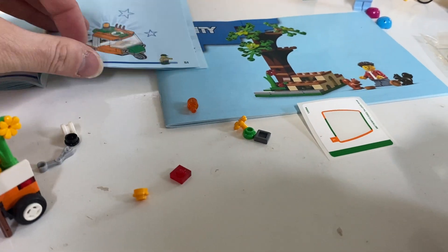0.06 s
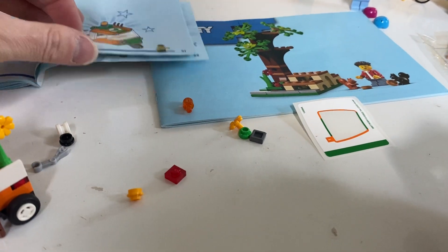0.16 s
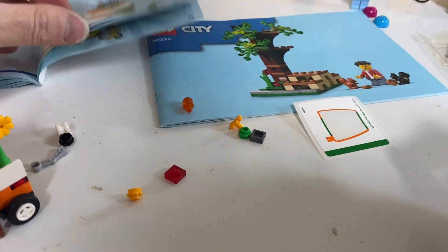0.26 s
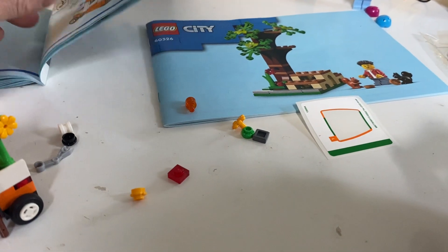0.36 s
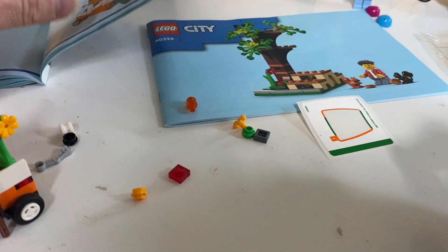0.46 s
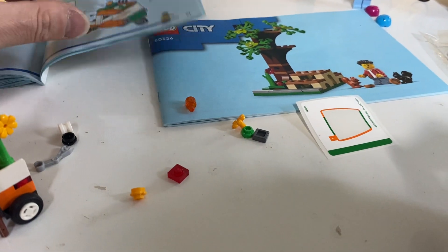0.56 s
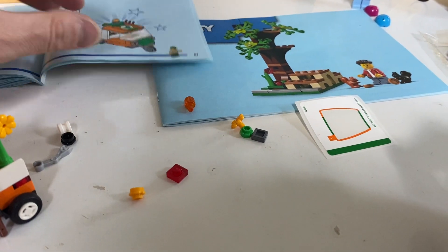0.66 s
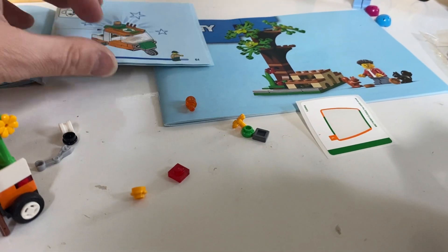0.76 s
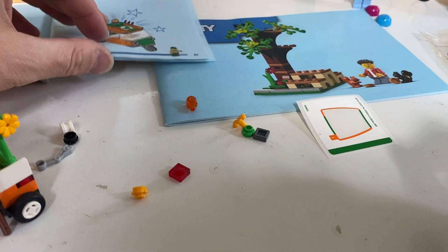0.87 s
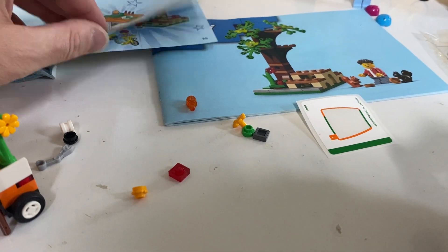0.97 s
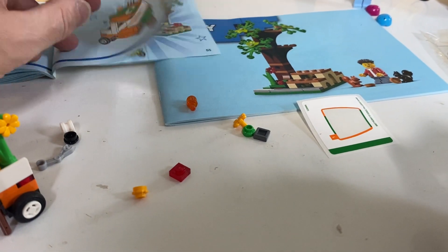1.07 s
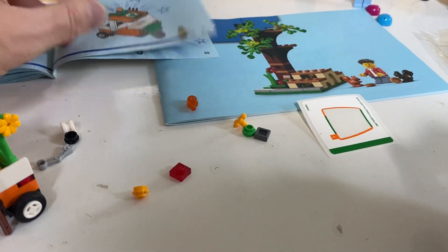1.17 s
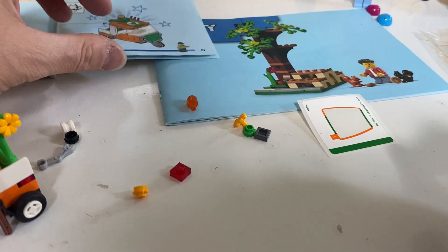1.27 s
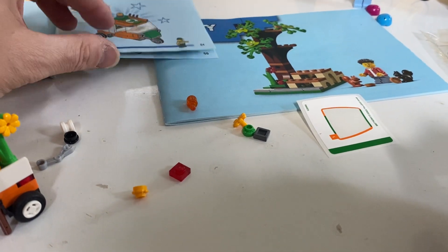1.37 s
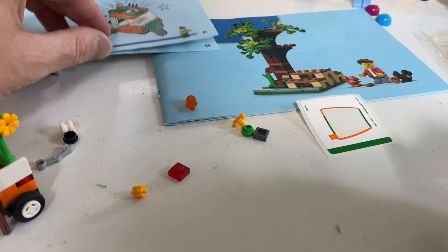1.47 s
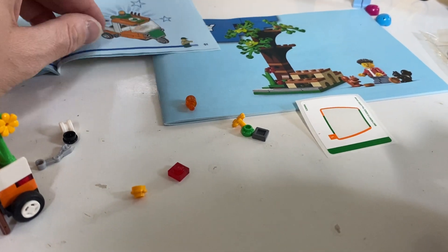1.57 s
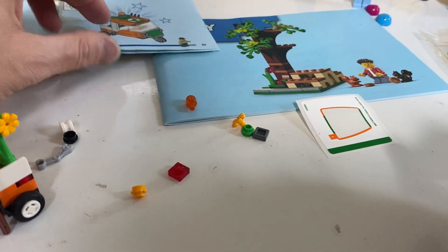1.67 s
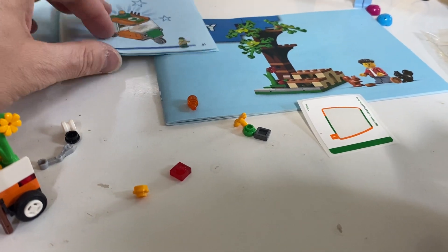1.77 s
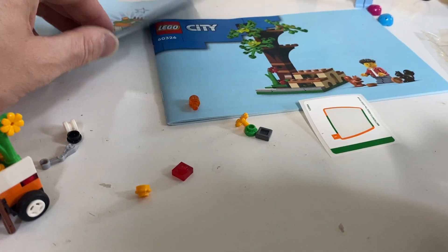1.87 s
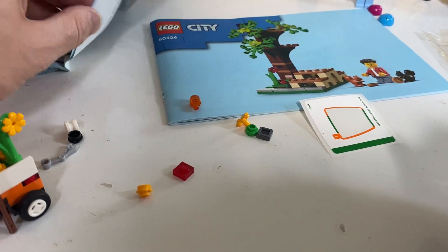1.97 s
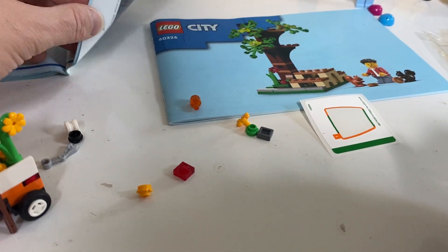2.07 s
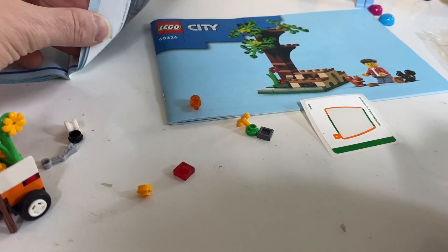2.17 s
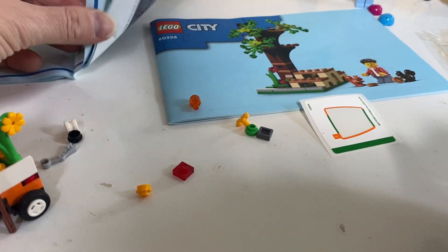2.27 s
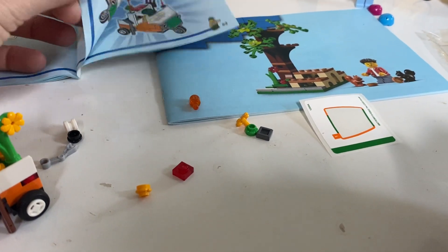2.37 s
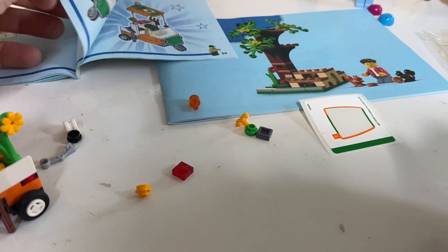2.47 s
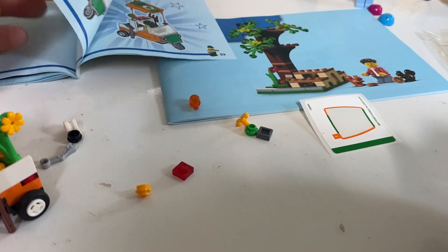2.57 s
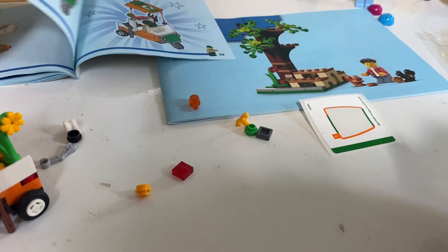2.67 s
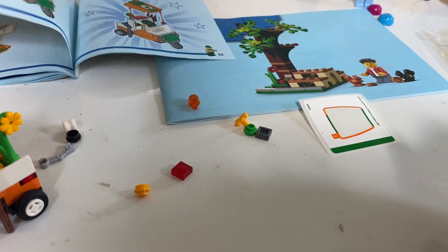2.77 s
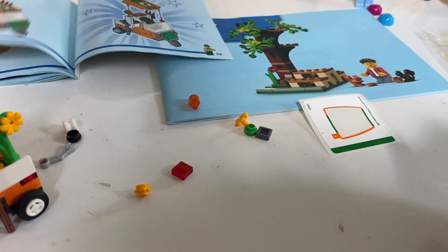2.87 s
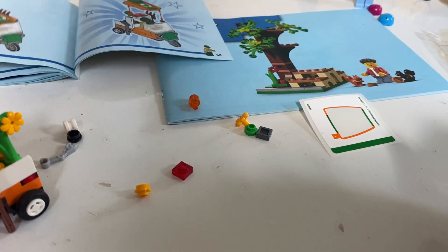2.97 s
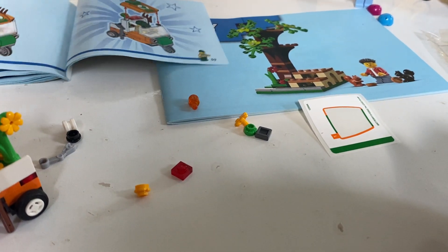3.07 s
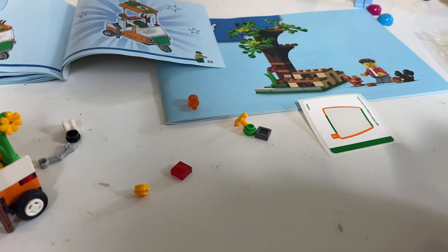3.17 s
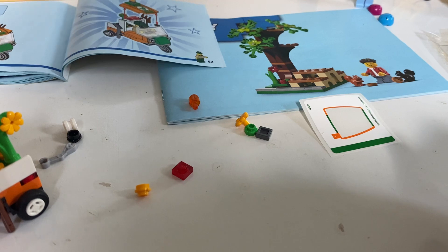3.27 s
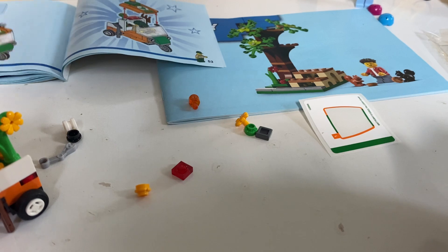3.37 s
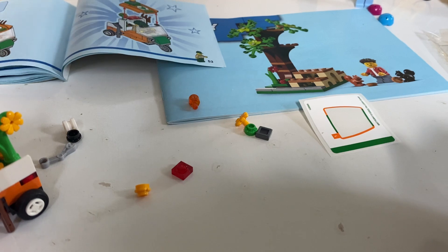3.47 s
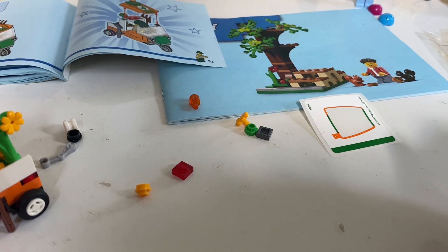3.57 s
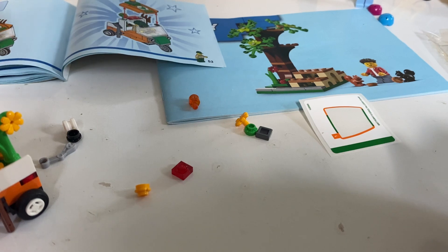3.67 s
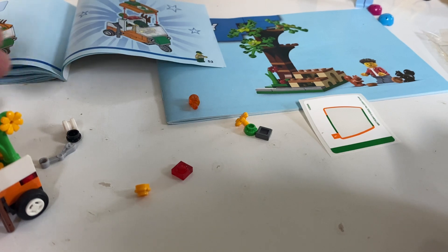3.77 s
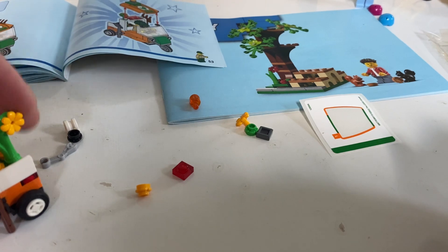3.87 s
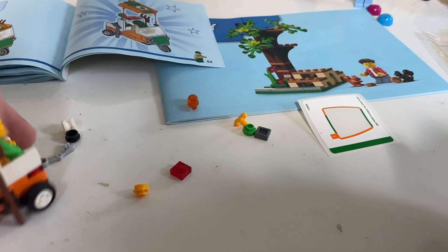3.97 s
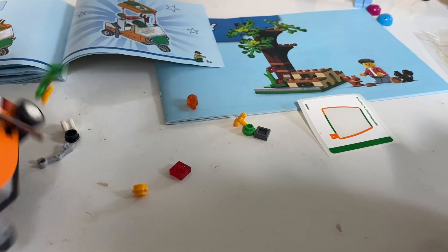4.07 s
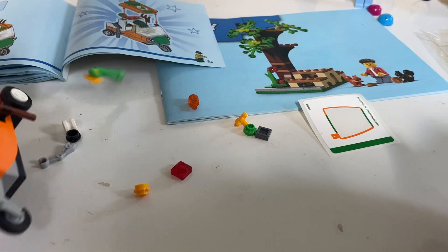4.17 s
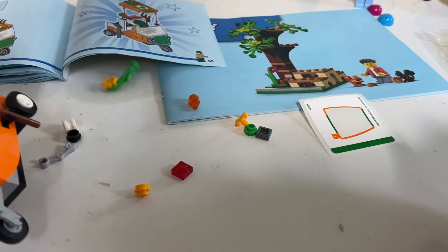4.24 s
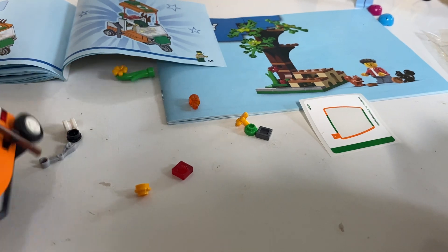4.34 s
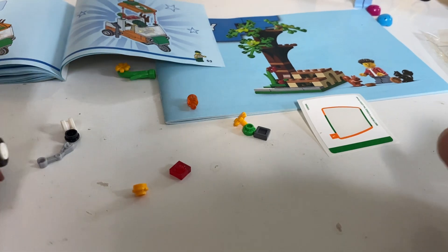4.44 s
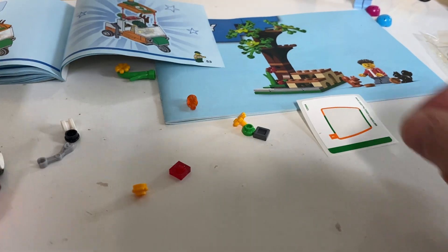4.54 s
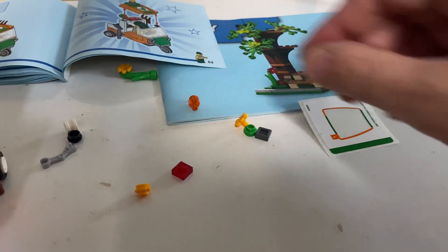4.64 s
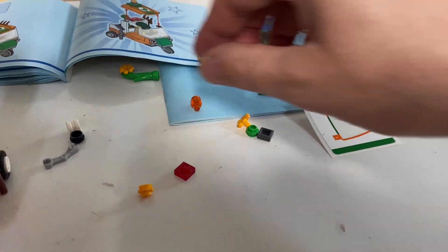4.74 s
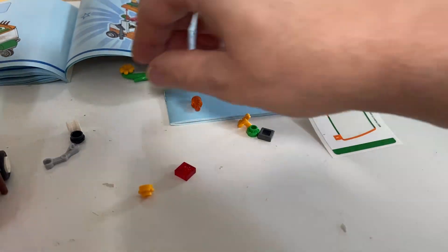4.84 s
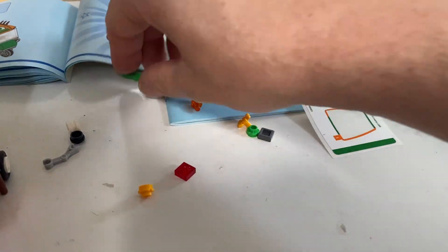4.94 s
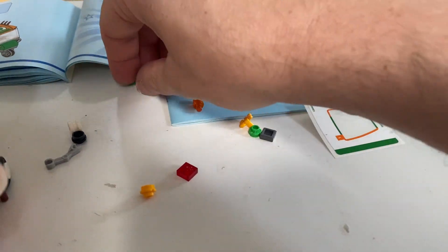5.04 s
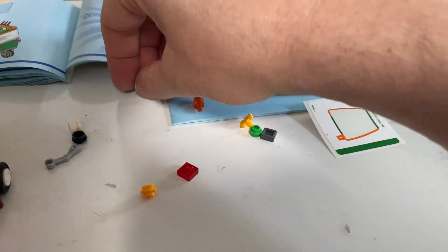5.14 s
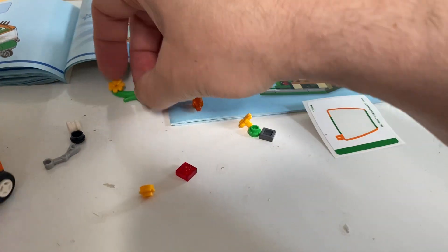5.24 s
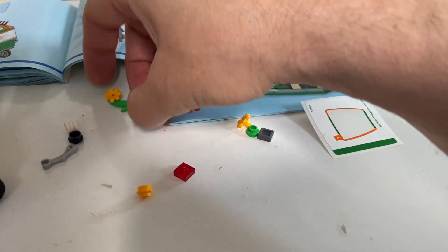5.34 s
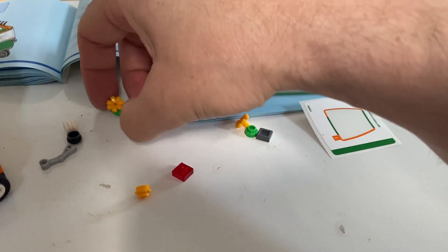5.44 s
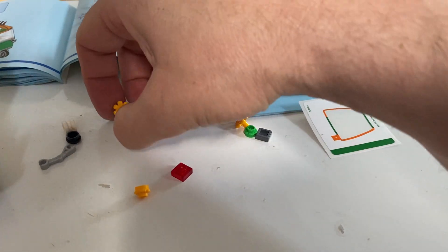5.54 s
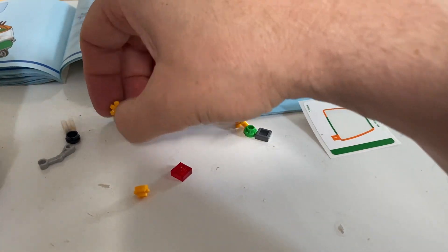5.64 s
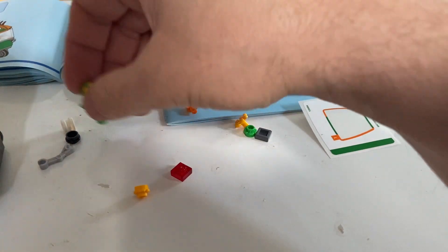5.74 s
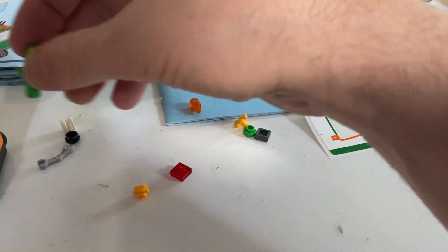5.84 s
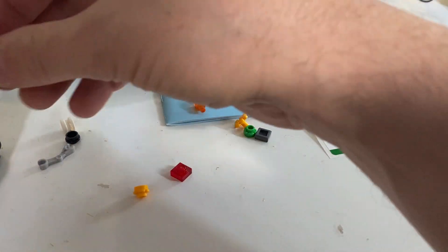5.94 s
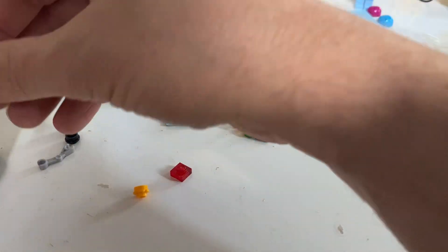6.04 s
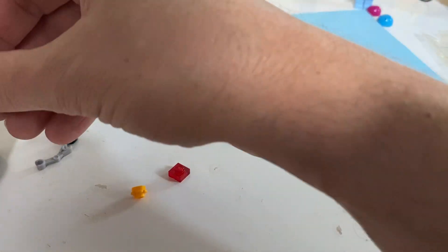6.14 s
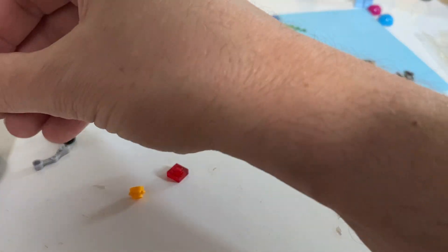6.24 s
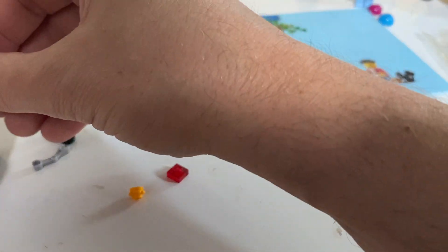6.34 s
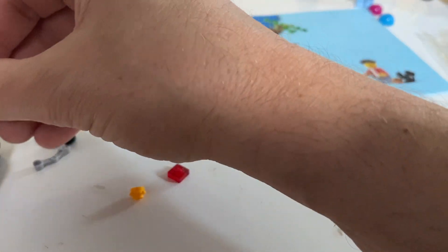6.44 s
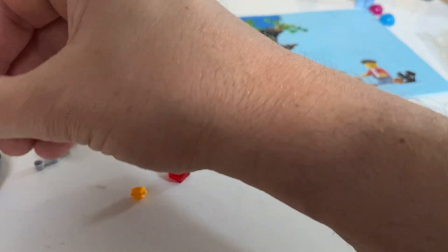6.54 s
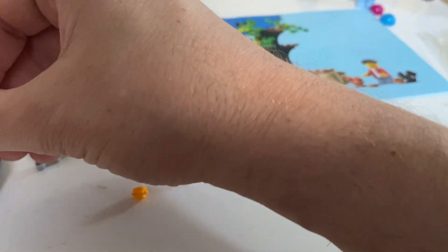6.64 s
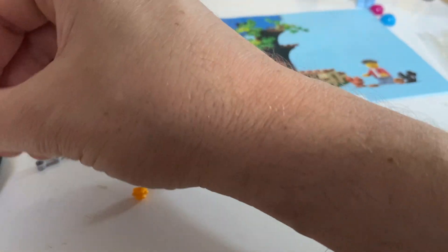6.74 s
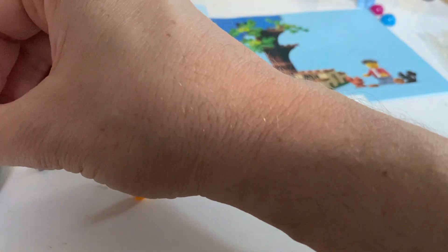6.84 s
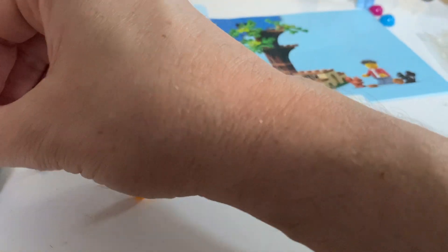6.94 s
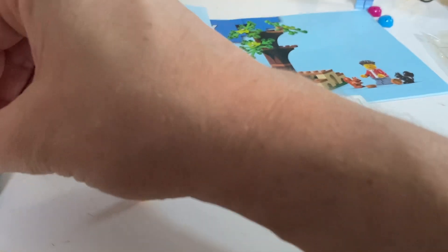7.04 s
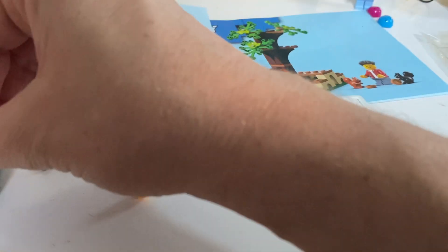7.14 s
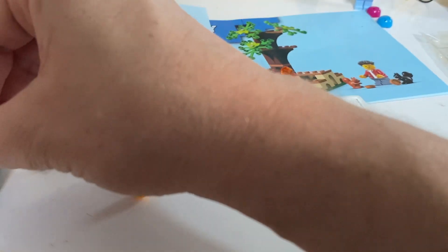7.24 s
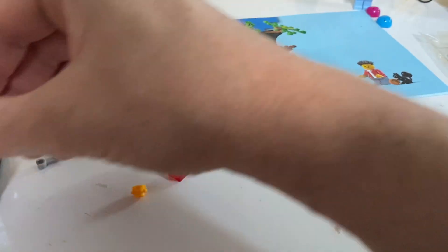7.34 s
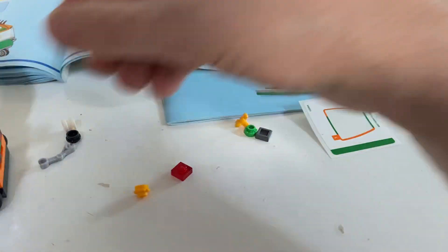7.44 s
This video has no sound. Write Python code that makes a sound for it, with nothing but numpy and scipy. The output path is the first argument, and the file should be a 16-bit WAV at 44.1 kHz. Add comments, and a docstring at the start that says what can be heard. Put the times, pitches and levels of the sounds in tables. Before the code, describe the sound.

Close on a table in a small room, a paper booklet's pages swish, flap and snap for over three seconds. Then a plastic brick toy is picked up with loud, sharp clacks; a loose part drops, bounces and taps quickly to rest. Soft bumps, light clicks, a brief scraping judder and faint finger rubs follow, over low rumble and faint hiss.

```python
"""A toy of plastic bricks is picked up from a table: it clicks, and a shed part bounces and rocks to rest.
Each contact is struck, detuned resonances plus short noise bursts. Before it a paper booklet's page turns:
gated friction noise with snaps. Soft bumps are low bursts; fingers rub and squeak as noise and wandering
tones; a part dragged back judders in rapid slips. A low rumble, a table murmur and a faint hiss lie
underneath, and a small room answers."""
import sys
import numpy as np
from scipy import signal
from scipy.fft import rfft, irfft, next_fast_len
from scipy.io import wavfile
from scipy.ndimage import uniform_filter1d, map_coordinates

SR = 44100
rng = np.random.default_rng(int(sys.argv[2]) if len(sys.argv) > 2 else 0)


def store_wav(level_fs):
    """Save 16-bit WAV to argv[1]."""
    pcm = np.round(np.clip(np.atleast_2d(level_fs), -1, 1) * 32767)
    wavfile.write(sys.argv[1], SR, pcm.T.astype(np.int16))


N = 330880


def amp(db):
    """Decibels to linear gain."""
    return 10 ** (np.asarray(db) / 20)


def unit(x):
    """Scale to rms 1."""
    return x / np.sqrt(np.mean(x ** 2) + 1e-20)


def along(points, hz):
    """Read (frequency, value) points on a log frequency axis."""
    f, v = np.transpose(points)
    return np.interp(np.log(hz + 1), np.log(f + 1), v)


def curves(rows):
    """One value per sample for each column after the time."""
    s, *cols = np.transpose(rows)
    return [np.interp(np.arange(N) / SR, s, c) for c in cols]


def wobble(rate):
    """A random curve of straight segments, rate knots a second."""
    knots = rng.standard_normal(int(N * rate / SR) + 4)
    return map_coordinates(knots, [np.arange(N) * rate / SR], order=1)


def filtered(x, response):
    """Shape x by a (possibly complex) response of frequency."""
    n = x.shape[-1]
    m = next_fast_len(n + 4096)
    return irfft(rfft(x, m) * response(np.fft.rfftfreq(m, 1 / SR)), m)[..., :n]


def noise(spectrum, size=N, ripple_db=0):
    """Coloured noise of rms 1 with random resonances; rows: common to both microphones, their difference."""
    grid = np.geomspace(100, SR / 2, 90)
    ripple = ripple_db * rng.standard_normal(len(grid))
    white = rng.standard_normal((2, size))
    return unit(filtered(white, lambda hz: amp(along(spectrum, hz) + np.interp(hz, grid, ripple))))


def add(track, s, sound):
    """Mix a sound in at time s."""
    part = track[:, max(round(s * SR), 0):][:, :sound.shape[-1]]
    part += sound[..., :part.shape[-1]]


def blow(x):
    """Scale a hit to the energy of one millisecond at level 1."""
    return x / np.sqrt(np.sum(x[0] ** 2) * 1000 / SR + 1e-20)


def burst(spectrum, t60, attack, size=8192):
    """Many damped resonances struck at once, a new mix for every point of contact (t60, attack in s)."""
    t = np.arange(size) / SR
    tone = noise(spectrum, size=size, ripple_db=3)
    return blow(tone * amp(-60 * t / t60) * (1 - np.exp(-t / attack)))


def ring(modes, scatter_db, detune, size=8192):
    """A struck body; strengths and pitches shift with the point of contact and the grip."""
    t = np.arange(size) / SR
    hz, db, t60 = np.transpose(modes)[:, :, None]
    strength, shift, skew = rng.standard_normal((3, len(modes), 1))
    sign = rng.choice([-1, 1], hz.shape)
    envelope = amp(db + scatter_db * strength - 60 * t / t60)
    partials = sign * envelope * np.sin(2 * np.pi * hz * (1 + detune * shift) * t)
    return blow(np.array([partials.sum(0), (skew * partials).sum(0)]))


def friction(spectrum, patchy_db, grain_db, catch_db, count=4):
    """Sliding noise of rms 1: a grainy rush with shifting resonances, plus crisp catches at several points."""
    rush = noise(spectrum) * unit(amp(grain_db * wobble(400) + wobble(35)))
    # a random field, smoothed over frequency and time, moves the resonances as the surface bends
    z = signal.stft(rush, nperseg=1024)[2]
    field = uniform_filter1d(rng.standard_normal(z.shape[1:]), size=10, axis=0)
    field = uniform_filter1d(field, size=6, axis=1)
    rush = unit(signal.istft(z * amp(patchy_db * unit(field)), nperseg=1024)[1][:, :N])
    catches = np.zeros((2, N))
    for _ in range(count):
        jolts = (rng.random(N) < 45 / SR) * rng.random(N) ** 3  # about 45 a second, mostly weak
        catch = burst(spectrum, t60=0.0065, attack=0.00014, size=1024)
        catches += signal.oaconvolve(jolts[None], catch, axes=1)[:, :N]
    return unit(rush + amp(catch_db) * unit(catches))


# fader moves of the two low layers: time_s, rumble_db, murmur_db
RUMBLE = [(0.0, -57.5, -71.5), (1.29, -51, -66), (1.5, -56, -66.5), (2.07, -56, -67.5), (3.91, -68, -72.5),
          (4.05, -60.5, -55), (4.76, -57, -63), (5.28, -54, -49.5), (6.33, -61, -67.5), (7.5, -60.5, -63)]
# tone of the rumble, the handling murmur and the steady hiss: frequency_hz, density_db
LOW = [(20, -44.5), (35, -4.5), (58, 4.5), (95, -3), (140, -13.5), (300, -22.5), (1000, -69)]
MURMUR = [(60, -12.5), (130, 2.5), (170, -1.5), (208, 5), (250, -6), (308, -5.5), (450, -11), (2500, -38.5)]
FLOOR = [(100, 9.5), (1000, -12), (3000, -17), (16000, -38)]


def background():
    """An uneven low rumble, the murmur of handling in the table, and a faint steady hiss."""
    rumble_db, murmur_db = curves(RUMBLE)
    uneven = unit(amp(2 * wobble(12)))
    rumble = amp(rumble_db + 1.5) * noise(LOW)
    murmur = amp(murmur_db + 3.0) * noise(MURMUR)
    return uneven * (rumble + murmur) + amp(-76.5) * noise(FLOOR)


SLIDE_ATTACK_S = .03


def slide(s, length, growth_db, fall_db_per_s):
    """Gain of one slide: it sets in, changes by growth_db along its length, and dies as the page stops."""
    t = np.arange(N) / SR - s
    onset = np.clip(t / SLIDE_ATTACK_S, 0, 1)
    growth = growth_db * (np.clip(t / length, 0, 1) - 1)
    return onset * amp(growth - fall_db_per_s * np.clip(t - length, 0, 1))


# page slides; level_db is the hiss at the end of the slide, sheet_db the bending sheet against it:
# start_s, length_s, level_db, sheet_db, growth_db
SLIDES = [(0, 0.3, -70.5, -8.5, -5.5), (0.205, 0.12, -70.5, 9.5, 6), (0.841, 0.19, -55.5, -1, 14.5),
          (1.08, 0.049, -73, 14.5, -7), (1.382, 0.077, -54.5, -5.5, 16), (1.783, 0.33, -60, 0.5, 2),
          (2.029, 0.18, -46, -2.5, 16), (2.2, 0.16, -44, -2.5, 8), (2.437, 0.092, -46.5, -11, 12.5),
          (2.57, 0.14, -65, -20, -4), (2.67, .27, -61, 0.5, -0.5), (2.949, 0.22, -66, -7, -6.5),
          (3.251, 0.14, -58, -5, 10.5)]
# paper buckling; flap_db sets the sheet's flap against the snap: start_s, level_db, flap_db, flap_pitch_hz
SNAPS = [(0.167, -39.5, -23, 2480), (0.2384, -26.5, -22, 2560), (0.2734, -26.5, -25.5, 1530),
         (1.0278, -26, -32, 1190), (1.104, -52.5, 12, 1700), (1.4163, -27, -22, 1530),
         (1.824, -39.5, -13, 700), (1.8954, -30.5, -17, 1030), (2.063, -39, -19, 1000),
         (2.2387, -43.5, -4.5, 1060), (2.297, -28.5, -17, 1630), (2.3262, -24, -15, 900),
         (2.338, -28, -10.5, 1190), (2.344, -30, -25, 900), (2.6885, -38, -17, 1140),
         (2.834, -44.5, -5.5, 2660), (2.8614, -42.5, -2.5, 2510), (2.899, -53, -3.5, 2160),
         (2.918, -40.5, -10, 5000), (2.958, -52.5, 2, 920), (3.0598, -41, -14.5, 1170),
         (3.353, -36.5, -23, 2500), (3.419, -52, -2, 2260)]
# tone of the paper hiss and of the bending sheet: frequency_hz, density_db
HISS = [(300, -16), (1500, -14.5), (3000, -3), (5500, -0.5), (8000, -2.5), (12000, -2), (15000, -4.5),
        (16500, -20)]
SHEET = [(100, 2), (300, 3.5), (1100, 2.5), (2300, 0), (4000, -10.5), (9000, -29.5)]
# tone of the flap: multiple_of_flap_pitch, density_db
FLAP = [(.12, -8), (.6, -6.5), (1, 1.5), (1.8, -7), (6.998, -33.5)]
HISS_FALL_DB_PER_S, SHEET_FALL_DB_PER_S = 286, 240


def booklet():
    """The page slides in tiny catches, bends, and snaps and flaps where it buckles."""
    hiss_gain, sheet_gain = np.zeros((2, N))
    for s, length, db, sheet_db, growth_db in SLIDES:
        hiss_slide = amp(db) * slide(s, length, growth_db, HISS_FALL_DB_PER_S)
        sheet_slide = amp(db + sheet_db) * slide(s, length, growth_db, SHEET_FALL_DB_PER_S)
        hiss_gain = np.maximum(hiss_gain, hiss_slide)
        sheet_gain = np.maximum(sheet_gain, sheet_slide)
    hiss = friction(HISS, patchy_db=3, grain_db=1.2, catch_db=-7)
    sheet = friction(SHEET, patchy_db=3.5, grain_db=2, catch_db=-1)
    out = amp(-0.5) * hiss_gain * hiss + amp(-1.0) * sheet_gain * sheet
    for s, db, flap_db, flap_hz in SNAPS:
        snap = amp(-7) * burst(HISS, t60=.014, attack=.0004)
        flap_tone = np.array(FLAP) * [flap_hz, 1]
        flap = amp(flap_db + 8.0) * burst(flap_tone, t60=0.022, attack=0.0028)
        add(out, s, amp(db) * (snap + flap))
    return out


# soft bumps of hand and toy on the table; bass_db trims the bass: start_s, level_db, bass_db
BUMPS = [(2.333, -48.5, 1), (3.97, -37.5, -1), (4.438, -32, -13), (4.519, -36, -5), (5.398, -43.5, 0.5),
         (5.626, -31, -28), (6.589, -50.5, -3.5), (6.762, -51.5, 8.5), (6.849, -51, -1), (7.051, -41, -9.5),
         (7.339, -38, -9)]
# tone of the thud and of the bass under it: frequency_hz, density_db
THUD = [(100, -18.5), (380, -5), (550, 3.5), (900, -11.5), (1500, -19), (3000, -34.5), (8000, -51)]
BASS = [(30, -23.5), (75, 3), (140, -2), (200, -3), (300, -7), (2000, -67)]


def bumps():
    """Soft contacts reach only the low resonances of the table."""
    out = np.zeros((2, N))
    for s, db, bass_db in BUMPS:
        thud = amp(6.0) * burst(THUD, t60=0.12, attack=0.00079)
        bass = amp(bass_db + 17.5) * burst(BASS, t60=0.18, attack=0.0027)
        add(out, s, amp(db) * (thud + bass))
    return out


# hard plastic contacts; knock_db and treble_db trim the table knock and the sharp tick:
# start_s, level_db, knock_db, treble_db
CLICKS = [(3.8806, -41, -4, -9.5), (3.909, -35, -4.5, -16), (3.9664, -24, -21.5, -7),
          (3.972, -3.5, -46, -10), (3.9854, -25, -17.5, -6.5), (3.9924, -19, -33.5, -11),
          (4.0193, -19.5, -43.5, -13), (4.0286, -27.5, -32.5, -12.5), (4.0502, -17.5, -25.5, -12.5),
          (4.1526, -4, -15, -19), (4.2247, -9.5, -16.5, -7.5), (4.2484, -20.5, -13, -7),
          (4.2545, -17, -18, -13), (4.269, -22, -12, -14), (4.296, -29, -8, -21), (4.3254, -22, -15, -14.5),
          (4.3363, -18, -15.5, -5), (4.431, -42.5, 5, -18), (4.4792, -39.5, 0, -13),
          (4.5132, -26.5, -10, -10.5), (4.5208, -21.5, -14, -16.5), (4.558, -34.5, -6, -17.5),
          (4.6588, -40, -6.5, -12.5), (4.9487, -31, -15.5, -24.5), (4.9941, -36.5, -7.5, -13.5),
          (5.1652, -35.5, -12.5, -16), (5.191, -43, -4, 2.5), (5.3792, -36.5, -0.5, -13),
          (5.4051, -25.5, -11.5, -11.5), (5.439, -31.5, -13, -14), (5.4864, -38, -8, -17),
          (5.6126, -35, -29, -10.5), (5.6262, -20.5, -3.5, -8), (5.6375, -29.5, -5, -9.5),
          (5.7428, -40.5, 3.5, -2.5), (5.9359, -32.5, -6.5, -10.5), (6.7605, -29, -18, -9),
          (6.7704, -38, -18.5, -33), (7.4086, -38, -2.5, -14)]
# the dropped part rocks to rest in even, fading taps
ROCK_START_S, ROCK_GAP_S = 4.3514, .015
ROCK_DB, ROCK_LOSS_DB, ROCK_KNOCK_DB, ROCK_TREBLE_DB = -23.5, 2.5, -16.5, -13.5  # loss is per tap


def contacts(count):
    """The single clicks, and the taps of the part that rocks to rest."""
    taps = []
    for k in range(count):
        level_db = ROCK_DB - k * ROCK_LOSS_DB
        taps.append((ROCK_START_S + k * ROCK_GAP_S, level_db, ROCK_KNOCK_DB, ROCK_TREBLE_DB))
    return CLICKS + taps


# tone of the crack (before its pitch shift), the edge tick and the tabletop's dull body:
# frequency_hz, density_db
CRACK = [(300, -40.5), (1200, -26), (2100, 7.5), (4200, 3), (7000, -1.5), (10000, -41), (16000, -36.5)]
TICK = [(1500, -32.5), (4000, -9.5), (6500, 2), (11000, 0.5), (14500, -5), (16500, -29.5)]
KNOCK = [(150, -16.5), (430, -13.5), (680, 3), (900, 3.5), (1080, -6.5), (2300, -14), (4000, -27.5)]
# ringing modes of the brick toy and of the tabletop: frequency_hz, level_db, t60_s
BRICKS = [(2020, 7, 0.022), (2600, 3, .02), (2900, 0, .04), (3270, -1, .04), (4130, 7, 0.035),
          (5050, -3, 0.025), (6200, 4, 0.02), (6680, 1, 0.025), (7250, 2, 0.02)]
TABLE = [(205, -19, 0.54), (307, -16.5, 0.22), (704, 0.5, .06), (803, 1.5, 0.04), (930, -0.5, 0.035),
         (1300, 4.5, .04), (1690, 1, 0.04), (2195, -8, 0.064), (2810, -4.5, 0.029)]
REBOUND_S, REBOUND_DB = .0022, -8.5  # a hard part strikes again at once, give or take 30 percent in time


def bricks():
    """Each contact cracks, ticks at its sharp edge, rings the toy and knocks the tabletop."""
    out = np.zeros((2, N))
    for s, db, knock_db, treble_db in contacts(count=4):
        # light touches last longer than hard blows; brighter parts are smaller and crack higher
        contact = .0012 * amp(-db / 2 - 12)
        part = np.array(CRACK) * [2 ** ((treble_db + 14) / 24), 1]
        crack = amp(-8.5) * burst(part, t60=0.008 + 2 * contact, attack=contact)
        tick = amp(treble_db + 3) * burst(TICK, t60=0.01, attack=contact / 2)
        toy = amp(-12) * ring(BRICKS, scatter_db=3, detune=.012)
        tones = ring(TABLE, scatter_db=2, detune=.008)
        body = amp(-1) * burst(KNOCK, t60=0.034, attack=0.00032)
        table = amp(knock_db + 3.0) * (tones + body)
        add(out, s, amp(db) * (crack + tick + toy + table))
        # a faint, soft noise burst leads in to each click; the part then rebounds and chatters faintly
        lead_in = burst(part, t60=.02, attack=.002, size=1024)
        add(out, s - rng.uniform(.001, .004), amp(db - 27) * lead_in)
        add(out, s + REBOUND_S * rng.uniform(.7, 1.3), amp(db + REBOUND_DB) * (crack + tick))
        chatter = burst(part, t60=.014, attack=contact, size=1024)
        add(out, s + rng.uniform(.005, .016), amp(db - 21) * chatter)
    return out


# fingers and plastic sliding; squeak_db is against the rub: start_s, length_s, level_db, pitch_hz, squeak_db
STROKES = [(3.975, 0.05, -58, 3900, 15.5), (4.08, 0.13, -60, 1595, 2), (4.241, 0.19, -51.5, 2293, -6),
           (4.901, 0.25, -60.5, 2060, -14), (5.067, 0.26, -59.5, 3250, -15), (5.405, 0.14, -56, 2100, -11),
           (5.681, 0.024, -52.5, 1645, -3.5), (6.242, 0.06, -68, 4170, 5.5), (6.252, 0.08, -66.5, 2083, -1),
           (6.438, 0.17, -63.5, 1435, -7), (6.805, 0.25, -63.5, 1096, -12), (7.147, 0.12, -65.5, 998, -7.5),
           (7.213, 0.049, -68, 2620, 7), (7.257, 0.64, -64.5, 2674, -13)]
# tone of the rubbing skin: frequency_hz, density_db
SKIN = [(150, -15.5), (500, -1), (900, 8.5), (1500, 3.5), (2500, -2.5), (4500, -1), (12000, -13),
        (16000, -23)]
SQUEAK_SHARPNESS = 11  # pitch over half-width, for a squeak as loud as its rub
SQUEAK_SAG, SQUEAK_WANDER = .15, 0.34  # pitch fall over a stroke and random drift, in full resonance widths


def fingers():
    """Each stroke swells quickly and eases off; its drifting, sagging resonance narrows as it squeaks louder."""
    out = np.zeros((2, N))
    skin = friction(SKIN, patchy_db=3.5, grain_db=2, catch_db=-1.5)
    for s, length, db, hz, squeak_db in STROKES:
        rub = skin[:, round(s * SR):round((s + length) * SR)]
        u = np.linspace(0, 1, rub.shape[1])
        half_width_hz = hz / np.clip(SQUEAK_SHARPNESS * amp(squeak_db), 4, 32)
        drift = SQUEAK_SAG * (.5 - u) + SQUEAK_WANDER * wobble(60)[:len(u)]
        pitch_hz = hz + 2 * half_width_hz * drift
        # slow complex noise, shifted up to the moving pitch, makes a narrow band around it
        grip = filtered(rng.standard_normal((2, 2, len(u))), lambda f: 1 / (1 + (f / half_width_hz) ** 4))
        carrier = np.exp(2j * np.pi * np.cumsum(pitch_hz) / SR)
        squeak = unit(np.real((grip[0] + 1j * grip[1]) * carrier))
        swell = np.sin(np.pi * u ** .6)
        add(out, s, amp(db + 3) * swell * (rub + amp(squeak_db) * squeak))
    return out


# fader moves as the part judders over the table: time_s, rap_db, scratch_db
DRAG = [(5.212, -26, -41.5), (5.221, -27.5, -25.5), (5.232, -19.5, -24), (5.245, -26, -26.5),
        (5.274, -27, -26), (5.287, -30.5, -33.5)]
# tone of a rap on the table: frequency_hz, density_db
RAP = [(90, -16.5), (205, -3), (420, -3), (850, 7), (1150, -11.5), (2000, -26.5)]
SLIP_HZ = 99


def drag():
    """A dragged part sticks and slips; each slip raps the table and scratches in catches that ring the plastic."""
    out = np.zeros((2, N))
    times, raps, scratches = np.transpose(DRAG)
    grit_tone = [(600, -7.5), (2500, -1.5), (4400, 3), (6500, -7), (12000, -2.5), (16000, -18)]
    slips = np.arange(times[0], times[-1], 1 / SLIP_HZ)
    for s in slips + rng.normal(0, 0.00067, len(slips)):
        rap = amp(-1) * burst(RAP, t60=0.015, attack=0.00084)
        hum = amp(-4.5) * ring(TABLE[:2], scatter_db=2.5, detune=0)  # the lowest modes of the tabletop
        add(out, s, amp(np.interp(s, times, raps)) * (rap + hum))
        scratch_gain = amp(np.interp(s, times, scratches))
        for delay in rng.uniform(0, .7 / SLIP_HZ, size=3):
            grit = burst(grit_tone, t60=.012, attack=.0002)
            plastic = ring(BRICKS[:6], scatter_db=3, detune=.02)
            add(out, s + delay, scratch_gain * (amp(-6.5) * grit + amp(-13) * plastic))
    return out


# decay of the walls' answer: frequency_hz, t60_s
ROOM = [(100, 1), (500, 0.17), (3000, 0.4), (8000, 0.19), (16000, 0.16)]


def room(x, near_db, far_db, near_t60, size=22050):
    """Things on the table scatter the sound at once; the walls answer later, with a decay set per frequency."""
    hz, t, z = signal.stft(rng.standard_normal((2, size)), SR, nperseg=256)
    tail = signal.istft(z * amp(-60 * t / along(ROOM, hz)[:, None]), SR, nperseg=256)[1]
    t = np.arange(tail.shape[1]) / SR
    tail = tail * (1 - np.exp(-t / 0.0019))
    near = rng.standard_normal(tail.shape) * amp(-60 * t / near_t60) * (1 - np.exp(-t / 0.00037))
    far_answer = amp(far_db) * tail / np.linalg.norm(tail[0])
    near_answer = amp(near_db) * near / np.linalg.norm(near[0])
    wet = signal.fftconvolve(x[:1], far_answer + near_answer, axes=1)[:, :N]
    tone = [(200, -4.0), (1000, 1.0), (4000, -5.5), (12000, -3)]  # frequency_hz, gain_db
    return filtered(wet, lambda hz: amp(along(tone, hz)))


# stereo width, the gain on the difference signal: frequency_hz, gain_db
WIDTH = [(60, -18), (300, -12.5), (900, 0), (1800, -2), (3500, -6.5), (5500, -4.5), (7500, -18.5)]


def scene():
    """Mix the close sounds, the room's answer to them and the background, then spread them to left and right."""
    close = booklet() + bumps() + bricks() + fingers() + drag()
    answer = room(close, near_db=-10.0, far_db=-12.0, near_t60=0.088)
    common, difference = close + answer + background()
    difference = filtered(difference, lambda hz: amp(along(WIDTH, hz)))
    return np.array([common + difference, common - difference])


# level of the left port over the right: frequency_hz, balance_db
BALANCE = [(100, 0), (450, 2.5), (820, 8.5), (1300, 0), (2700, 5), (3500, 1.5), (5500, 5), (7500, 0)]
# phase by which the left port leads: frequency_hz, lead_rad
LEAD = [(0, 0), (350, .1), (1000, 1.6), (1450, 2), (2200, .3), (7200, 0), (9000, -3.14), (13400, -9.42),
        (15500, -12.6)]
TOP_HZ = 16500


def record(dry):
    """Two microphone ports differ in level and phase; deep bass rolls off, hard peaks saturate, the top is cut."""
    sides = np.array([[1], [-1]]) / 2  # each port takes half of the difference

    def ports(hz):
        lead = np.interp(hz, *np.transpose(LEAD))
        return amp(sides * along(BALANCE, hz)) * np.exp(1j * sides * lead)

    def low_cut(hz):
        return hz ** 3 / (hz ** 3 + 32 ** 3)

    heard = filtered(dry, lambda hz: ports(hz) * low_cut(hz))
    held = heard / (1 + (heard / .9) ** 8) ** (1 / 8)  # peaks bend toward a ceiling of 0.9
    return filtered(held, lambda hz: hz < TOP_HZ)


dry = scene()
out = record(dry)
store_wav(out)
```